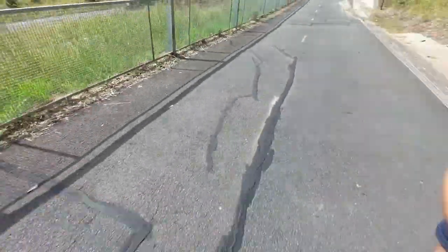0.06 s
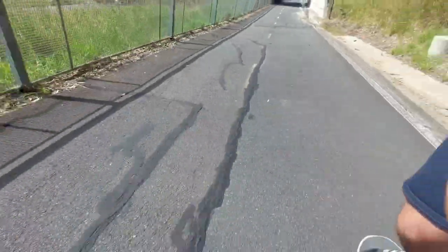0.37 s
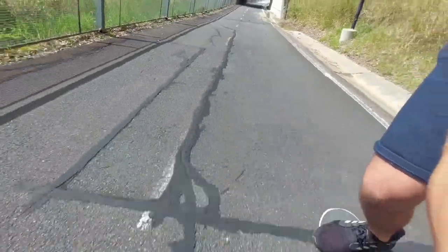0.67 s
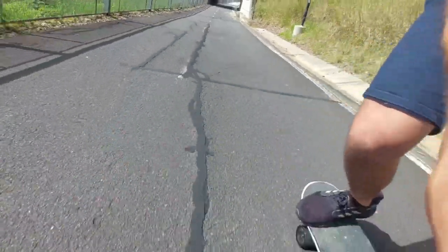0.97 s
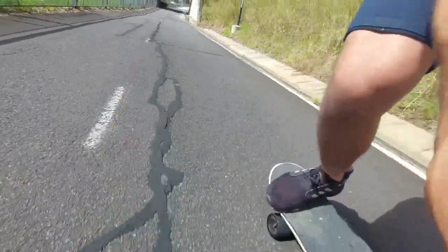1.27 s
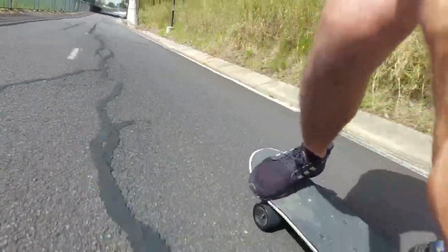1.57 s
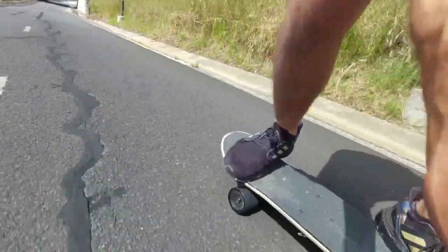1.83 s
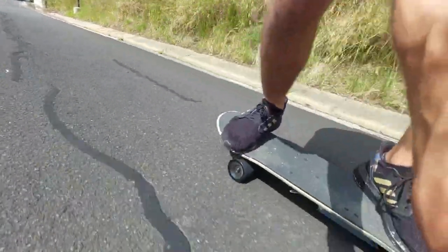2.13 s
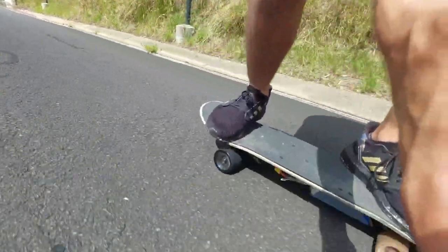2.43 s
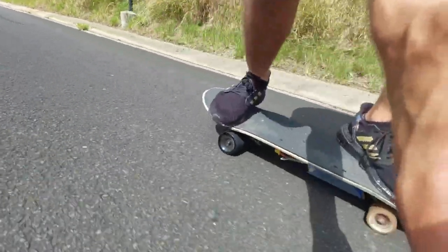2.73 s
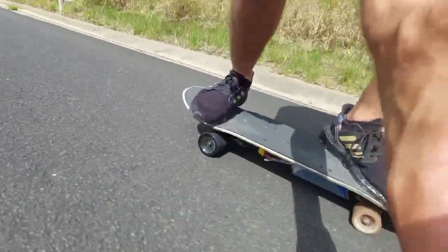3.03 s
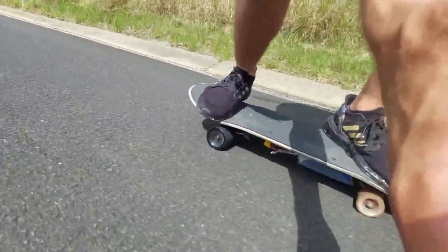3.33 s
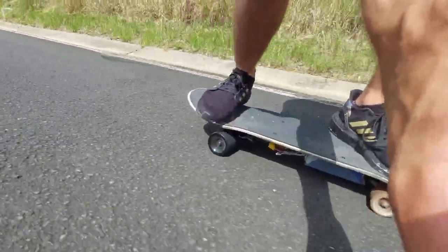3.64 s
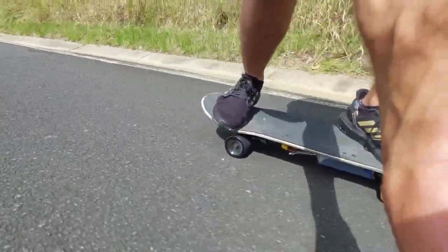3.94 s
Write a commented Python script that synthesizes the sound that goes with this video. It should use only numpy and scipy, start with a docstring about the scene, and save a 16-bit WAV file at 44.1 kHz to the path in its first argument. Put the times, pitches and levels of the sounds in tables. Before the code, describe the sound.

Electric skateboard wheels roar and hiss along a patched road, thumping and clacking over seams.

```python
"""On a patched asphalt road, an electric skateboard rolls fast, heard from its rider's position.
The road's grain drums the deck and wheels, louder after half a second. The tyres roar and hiss,
grit crackles, seams thump the board and rattle the trucks, and hard edges clack on the wheels.
Underneath, wind rumbles in the microphone's two ports."""
import sys
import numpy as np
from scipy import signal
from scipy.fft import rfft, irfft
from scipy.io import wavfile
from scipy.ndimage import uniform_filter1d

SR = 44100
rng = np.random.default_rng(int(sys.argv[2]) if len(sys.argv) > 2 else 0)


def dump_mix(stems):
    """Bounce the given channels to the path in sys.argv[1] as a 16-bit WAV at rate SR."""
    frames = np.atleast_2d(stems).T  # one column per channel
    limited = np.clip(frames, -1, 1)  # hard clip at full scale
    pcm = np.round(limited * 32767).astype(np.int16)
    wavfile.write(sys.argv[1], SR, pcm)


N = 176400
TIME = np.arange(N) / SR
BAND_LIMIT_HZ = 15900


def amp(db):
    """Decibels to gain."""
    return 10 ** (np.asarray(db) / 20)


def unit(x):
    """Scales to rms 1."""
    return x / np.sqrt(np.mean(x ** 2) + 1e-20)


def at_hz(table, hz):
    """Interpolates a table on a log-frequency axis."""
    table_hz, value = np.transpose(table)
    return np.interp(np.log(hz + 1), np.log(table_hz + 1), value)


def level(table, column=1):
    """One dB column of a time curve as a gain per sample."""
    rows = np.array(table)
    return amp(np.interp(TIME, rows[:, 0], rows[:, column]))


def add(mix, start_s, sound):
    """Mixes a sound in at a time."""
    part = mix[:, max(round(start_s * SR), 0):][:, :sound.shape[1]]
    part += sound[:, :part.shape[1]]


def ring(x, spectrum):
    """Minimum-phase body filter. Unit energy, so only the spectrum's shape counts."""
    size = 4096
    log_gain = np.log(amp(at_hz(spectrum, abs(np.fft.fftfreq(size, 1 / SR)))))
    minimum_phase = np.exp(np.conj(signal.hilbert(log_gain)))
    response = np.fft.ifft(minimum_phase).real[:size // 2]
    return signal.oaconvolve(x, response[None] / np.linalg.norm(response), axes=1)[:, :N]


def wander(slow_hz, fast_hz):
    """Random drift of rms 1 between two rates."""
    hz = np.fft.rfftfreq(N, 1 / SR)
    shape = hz / (hz + slow_hz) / np.sqrt(hz + slow_hz) / (1 + (hz / fast_hz) ** 4)
    return unit(irfft(rfft(rng.standard_normal(N)) * shape, N))


def flicker(x, depth_db):
    """Small time-frequency patches swell and fade at random."""
    bins = signal.stft(x, nperseg=384)[2]
    patches = uniform_filter1d(rng.standard_normal(bins.shape[1:]), size=7, axis=0)
    patches = unit(uniform_filter1d(patches, size=7, axis=1))
    return signal.istft(bins * amp(depth_db * patches), nperseg=384)[1][:, :N]


def contact(texture, rough_db):
    """Countless tiny blows of the road's stones, stronger where the surface is coarse."""
    return unit(rng.standard_normal((2, N)) * amp(rough_db * texture))


def strike(age_s, rise_s, decay_s):
    """Impact envelope: linear rise, exponential decay."""
    return np.minimum(age_s / rise_s, 1) * np.exp(-np.maximum(age_s - rise_s, 0) / decay_s)


def blows(table, rise_s, decay_s, column=1):
    """A burst of scraping contact per row, at the level in the given dB column."""
    force = sum(amp(row[column]) * strike(np.maximum(TIME - row[0], 0), rise_s, decay_s) for row in table)
    return force * rng.standard_normal((2, N))


def ping(hz, width_hz, rise_s, decay_s):
    """A short, rough ring: noise through one resonance."""
    age_s = np.arange(2400) / SR
    pole = np.exp((2j * np.pi * hz - np.pi * width_hz) / SR)
    tone = unit(signal.lfilter([1], [1, -pole], rng.standard_normal((2, len(age_s)))).real)
    return tone * strike(age_s, rise_s, decay_s)


# Steady wind. Each row: time in seconds, level in dB.
WIND_LEVELS = [(0, -33), (.6, -35.5), (1.1, -32), (2, -33.5), (2.75, -34.5), (3, -29.5), (4, -32)]
# Buffets. Each row: peak time in seconds, level in dB.
BUFFETS = [(.3, -33), (.69, -28), (1.15, -25.5), (1.225, -28), (1.55, -30), (1.69, -26), (1.88, -33),
           (2.94, -32), (3.26, -41)]
# Turbulence spectrum. Each row: frequency in Hz, gain in dB.
WIND_SPECTRUM = [(15, -20), (30, -16), (48, -12.5), (58, -5), (65, 1.5), (73, -1), (100, -4), (130, -0.5),
                 (170, -2), (300, -13.5), (700, -34.5), (2000, -59)]

def wind(likeness=0.41, buffet_width_s=0.023):
    """Lumpy low turbulence with a few buffets, only partly shared by the ports."""
    left, unrelated = rng.standard_normal((2, N))
    right = likeness * left + np.sqrt(1 - likeness ** 2) * unrelated
    air = unit(np.array([left, right]) * amp(2.5 * wander(slow_hz=13, fast_hz=33)))
    buffets = sum(amp(db) * np.exp(-((TIME - peak_s) / buffet_width_s) ** 2) for peak_s, db in BUFFETS)
    return amp(3.5) * ring(air * np.hypot(level(WIND_LEVELS), buffets), WIND_SPECTRUM)


# Strength of the grit and of the truck buzz. Each row: time in seconds, level in dB.
CRACKLE_LEVELS = [(0, -54), (.55, -48.5), (.64, -38), (.76, -40.5), (.85, -40.5), (1.1, -41), (1.22, -38),
                  (1.4, -46), (1.65, -43), (2.08, -42.5), (2.24, -40), (2.5, -48), (2.95, -44.5),
                  (3.45, -37.5), (4, -45)]
# Grain pitch. Each row: time in seconds, median pitch in Hz.
GRIT_PITCHES = [(0, 3100), (1.8, 3400), (3.5, 4480)]

def grit(grains_per_s=215, spread_octaves=0.23, spread_db=3.2):
    """Loose grains ping at random under the wheels, each at its own pitch."""
    pings = np.zeros((2, N))
    candidates = rng.random((900, 4))
    for when, chance, size, pitch in candidates:
        start_s = when * N / SR
        octaves = spread_octaves * np.log(pitch / (1 - pitch))
        hz = np.interp(start_s, *np.transpose(GRIT_PITCHES)) * 2 ** octaves
        grain = ping(min(hz, BAND_LIMIT_HZ), width_hz=510, rise_s=0.0013, decay_s=0.0041)
        if chance < grains_per_s * N / SR / len(candidates):
            add(pings, start_s, grain * amp(spread_db * min(-np.log(size), 2.5)))
    return amp(-4.5) * unit(pings) * level(CRACKLE_LEVELS)


# Truck resonance. Each row: frequency in Hz, gain in dB.
TRUCK_SPECTRUM = [(2200, -34), (2950, -8), (3160, -0.5), (3400, -6), (4300, -36.5)]

def truck_buzz(texture):
    """The road's grain keeps the metal trucks buzzing in a narrow band."""
    return amp(-10) * ring(contact(texture, rough_db=3) * level(CRACKLE_LEVELS), TRUCK_SPECTRUM)


# Tyre roar and hiss. Each row: time in seconds, level in dB.
ROAR_LEVELS = [(0, -49), (.15, -43), (.56, -41), (.61, -38.5), (.68, -38), (.8, -36.5), (1.05, -39),
               (1.22, -34.5), (1.45, -39), (1.62, -32), (1.75, -41), (2.1, -38), (2.25, -34), (2.75, -36.5),
               (3.15, -37.5), (3.35, -35), (4, -36.5)]
HISS_LEVELS = [(0, -53), (.55, -52.5), (.62, -54), (.85, -50.5), (1.4, -48.5), (2.05, -43.5), (2.22, -41),
               (2.42, -41), (2.55, -42), (3.22, -43), (3.4, -39), (4, -40.5)]
# Their spectra. Each row: frequency in Hz, gain in dB.
ROAR_SPECTRUM = [(500, -16.5), (900, 4), (1150, 1), (1380, 2.5), (1700, -2.5), (2150, -8), (2600, -9.5),
                 (3900, -18), (4700, -14.5), (5700, -21.5), (7500, -44), (15000, -17)]
HISS_SPECTRUM = [(2500, 6), (5000, -4.5), (5800, -2.5), (6400, -1), (7500, 6), (8600, -1.5), (9700, -11.5),
                 (10700, -3), (12200, 2), (13400, -4), (14700, -6), (15800, -4.5)]

def tyres(texture):
    """The tread roars on the stones and hisses as it peels off them."""
    roar = ring(contact(texture, rough_db=2) * level(ROAR_LEVELS), ROAR_SPECTRUM)
    hiss = ring(contact(texture, rough_db=1.5) * level(HISS_LEVELS), HISS_SPECTRUM)
    hiss *= amp(1.1 * wander(slow_hz=5.2, fast_hz=30))
    return amp(2) * flicker(roar, depth_db=3) + amp(2.5) * flicker(hiss, depth_db=2.5)


# Truck rattles. Each row: start in seconds, level in dB, clink pitch in Hz.
RATTLES = [(0.6049, -27.5, 3220), (0.7288, -23.5, 2870), (1.3837, -26, 3250), (1.472, -28.5, 3000),
           (1.541, -27, 3220), (1.624, -30, 3300), (1.6943, -25.5, 3150), (1.8257, -29.5, 2520),
           (1.869, -23, 3170), (1.9225, -22.5, 3280), (1.947, -25, 3130), (2.179, -25.5, 4340),
           (2.2055, -22.5, 3000), (2.26, -24, 3060), (2.3575, -22, 4430), (2.4083, -25.5, 2540),
           (3.1556, -27, 3280), (3.326, -24, 3570), (3.4635, -22.5, 2900), (3.487, -27, 4520),
           (3.5344, -28, 4800), (3.576, -23, 4500), (3.658, -26, 3180), (3.715, -24.5, 3810),
           (3.7434, -23.5, 4800), (3.7883, -25, 2500), (3.8656, -23.5, 3200), (3.908, -23, 4170)]
# Rattle spectrum. Each row: frequency in Hz, gain in dB.
RATTLE_SPECTRUM = [(400, -18), (1300, 11.5), (2100, 5.5), (3200, -2), (4700, -0.5), (6000, -3), (7700, -2),
                   (9700, -8), (12500, -6), (15800, -14)]

def truck_rattles(rise_s=0.0025):
    """Seams shake the trucks: a broad rattle with a pitched clink."""
    rattles = ring(blows(RATTLES, rise_s, decay_s=0.0075), RATTLE_SPECTRUM)
    clinks = np.zeros((2, N))
    for start_s, db, hz in RATTLES:
        add(clinks, start_s, amp(db) * ping(hz, width_hz=270, rise_s=rise_s, decay_s=0.0081))
    return amp(-5) * rattles + amp(-8) * clinks


# Edge hits. Each row: start in seconds, knock level in dB, crack level in dB.
CLACKS = [(.344, -15, -37), (.366, -14, -42), (.659, -12, -27), (.6705, -24, -23.5), (.675, -14, -23),
          (.7285, -23, -25), (.7555, -30, -29.5), (.792, -13.5, -44), (1.06, -14, -35), (1.601, -10, -41),
          (1.825, -20, -36), (1.937, -9, -29), (2.532, -27, -26), (2.645, -13, -26.5), (2.965, -12, -29),
          (3.09, -9.5, -43), (3.716, -9, -30), (3.79, -12, -21), (3.861, -11, -25)]
# Their spectra. Each row: frequency in Hz, gain in dB.
KNOCK_SPECTRUM = [(150, -25), (400, 6), (700, 4.5), (950, 0), (1500, -13), (2500, -32), (8000, -69)]
CRACK_SPECTRUM = [(600, -12), (1400, 10.5), (2100, 4.5), (3100, 2.5), (5200, -5.5), (7000, -26),
                  (15000, -26)]

def wheel_clacks():
    """Hard edges strike the wheels: a dry knock with a sharp crack on top."""
    impulses = np.zeros((2, N))
    for start_s, knock_db, _ in CLACKS:
        add(impulses, start_s, amp(knock_db) * np.array([[1], [0]]))
    cracks = blows(CLACKS, rise_s=0.0002, decay_s=0.0024, column=2)
    return amp(12.5) * ring(impulses, KNOCK_SPECTRUM) + ring(cracks, CRACK_SPECTRUM)


def bump_ring(hz, swell_s):
    """A ring, shared by both ports, that swells as the wheel climbs a bump and then dies."""
    age_s = np.arange(5000) / SR
    detune, phase = rng.random(2)
    detuned_hz = hz * (1 + 0.098 * (detune - 0.5))
    tone = np.sin(2 * np.pi * (detuned_hz * age_s + phase))
    envelope = (age_s / swell_s * np.exp(1 - age_s / swell_s)) ** 2
    return np.outer([1, 0], tone * envelope)


# Bumps. Each row: start in seconds, deck level in dB, wheel level in dB, wheel pitch in Hz.
BUMPS = [(.59, -24, -8, 467), (.618, -24, -7, 481), (.655, -8, -15, 516), (.728, -9, -25, 470),
         (.828, -35, -13, 475), (.863, -26, -7.5, 513), (.921, -18, -16, 484), (.99, -34, -13, 503),
         (1.074, -26, -10, 481), (1.096, -26, -6, 474), (1.119, -10.5, -24, 493), (1.162, -14, -12, 478),
         (1.219, -33, -11.5, 497), (1.241, -31, -9, 485), (1.258, -8.5, -21, 473), (1.536, -12, -14, 486),
         (2.358, -27, -11, 474), (2.425, -16, -12.5, 494), (2.513, -15, -26, 486), (3.043, -31, -16, 507),
         (3.307, -12.5, -22, 510), (3.337, -17, -11, 520), (3.787, -12.5, -17, 483)]

def seam_thumps(deck_hz=257):
    """Cracks and patches set the deck and wheels ringing."""
    thumps = np.zeros((2, N))
    for start_s, deck_db, wheel_db, wheel_hz in BUMPS:
        add(thumps, start_s, amp(deck_db) * bump_ring(deck_hz, swell_s=0.008))
        add(thumps, start_s, amp(wheel_db) * bump_ring(wheel_hz, swell_s=0.0055))
    return thumps


# Wheel hum. Each row: time in seconds, pitch in Hz, level in dB.
HUM_CURVE = [(0, 534, -34), (.45, 540, -25.5), (.62, 494, -23), (.95, 482, -20.5), (1.19, 497, -26),
             (1.245, 475, -31), (1.3, 486, -25.5), (2.4, 464, -35), (4, 495, -37.5)]

def wheel_hum(texture, width_hz=83):
    """A narrow resonance of the wheels, sinking a little in pitch after half a second."""
    time_s, hz, _ = np.transpose(HUM_CURVE)
    carrier = np.exp(2j * np.pi * np.cumsum(np.interp(TIME, time_s, hz)) / SR)
    lowpass = signal.butter(2, width_hz / 2, fs=SR, output="sos")
    baseband = signal.sosfilt(lowpass, contact(texture, rough_db=1.5) / carrier)
    return unit((baseband * carrier).real) * level(HUM_CURVE, column=2)


# Board vibration. Each row: time in seconds, then deck, wheel drone and wheel growl levels in dB.
DRUMMING_LEVELS = [(0, -30.5, -29.5, -36), (.3, -30, -26, -36), (.53, -28, -27, -38),
                   (.62, -20.5, -22.5, -27.5), (.69, -19.5, -21, -28.5), (.85, -22, -20, -32),
                   (1, -24.5, -23, -30), (1.15, -19.5, -19.5, -29.5), (1.26, -21.5, -16, -33.5),
                   (1.42, -22, -27.5, -29), (1.62, -20.5, -23.5, -31), (2, -24, -25, -32.5),
                   (2.28, -20.5, -20.5, -32), (2.75, -24.5, -27, -33), (3.05, -23, -22, -33.5),
                   (3.35, -22.5, -25.5, -28), (3.65, -21.5, -22, -30.5), (4, -22, -24, -30.5)]
# Their spectra. Each row: frequency in Hz, gain in dB.
DECK_SPECTRUM = [(60, -36.5), (130, -10), (175, -9.5), (212, 1), (245, 1.5), (290, 1), (345, -4),
                 (430, -16.5), (800, -49.5)]
DRONE_SPECTRUM = [(200, -29.5), (320, -5.5), (390, 0.5), (430, -0.5), (480, -2.5), (540, -7), (605, -13.5),
                  (750, -20.5), (1600, -40.5), (4000, -78.5)]
GROWL_SPECTRUM = [(250, -25), (480, -4.5), (600, -3), (680, 0), (745, -3.5), (850, -2), (980, -8),
                  (1130, -18), (1600, -23), (4000, -72)]

def board_drumming(texture):
    """The asphalt shakes the deck and the wheels into their low resonances."""
    deck = ring(contact(texture, rough_db=1) * level(DRUMMING_LEVELS, column=1), DECK_SPECTRUM)
    drone = ring(contact(texture, rough_db=1) * level(DRUMMING_LEVELS, column=2), DRONE_SPECTRUM)
    growl = ring(contact(texture, rough_db=2) * level(DRUMMING_LEVELS, column=3), GROWL_SPECTRUM)
    return amp(0.1) * deck + amp(-1) * drone + amp(3.5) * growl


# Port likeness. Each row: frequency in Hz, coherence from 0 to 1.
PORT_LIKENESS = [(60, 0), (140, 0.75), (230, 0.83), (520, 1), (720, 0.98), (900, 1), (1300, 0.46),
                 (2000, 0.46), (4000, 0.25), (8000, 0.26), (15000, 0.54)]
# Port balance. Each row: frequency in Hz, right minus left in dB.
PORT_BALANCE = [(60, -3), (130, 1), (400, 2), (1000, 1.5), (3000, 0.5), (8000, .5), (13000, 2)]
# Left port lag. Each row: frequency in Hz, phase in radians.
PORT_LAG = [(0, 1), (220, -0.05), (400, 0.66), (560, 0.76), (860, 0.5), (1120, 1.74), (1460, 1), (2000, 4),
            (3100, 5), (4600, 5.5), (6000, 8.5), (8800, 11), (9800, 13), (11200, 17), (15800, 22)]

def ports(pair):
    """A shared and a left-only signal become two partly alike ports; the left hears later."""
    hz = np.fft.rfftfreq(N, 1 / SR)
    shared, left_only = rfft(pair)
    likeness = np.clip(at_hz(PORT_LIKENESS, hz), 0, 1)
    lean = amp(at_hz(PORT_BALANCE, hz) / 2)
    lag_rad = np.interp(hz, *np.transpose(PORT_LAG))
    left = (likeness * shared + np.sqrt(1 - likeness ** 2) * left_only) * np.exp(-1j * lag_rad)
    return irfft(np.array([left / lean, shared * lean]), N)


def scene():
    """One road texture drives the drumming, hum, buzz and tyres; wind lies beneath."""
    texture = wander(slow_hz=19.7, fast_hz=337)
    body = board_drumming(texture) + wheel_hum(texture)
    impacts = seam_thumps() + truck_rattles() + wheel_clacks()
    surface = truck_buzz(texture) + tyres(texture) + grit()
    return ports(body + impacts + surface) + wind()


def record(dry):
    """The microphone's band limit."""
    lowpass = signal.firwin(511, BAND_LIMIT_HZ, window=("kaiser", 9), fs=SR)
    return signal.oaconvolve(dry, lowpass[None], "same")


dry = scene()
out = record(dry)
dump_mix(out)
```